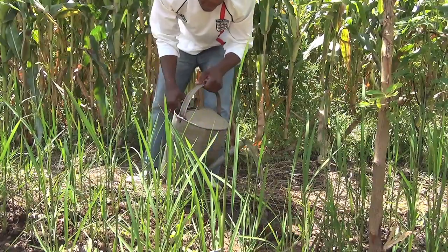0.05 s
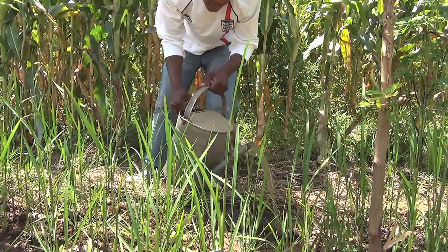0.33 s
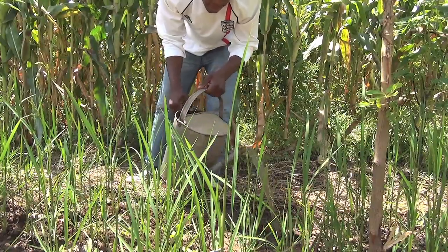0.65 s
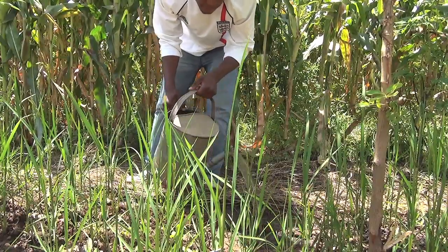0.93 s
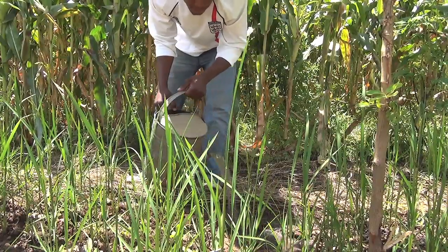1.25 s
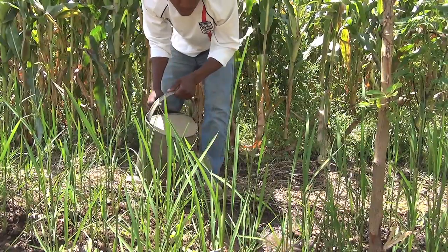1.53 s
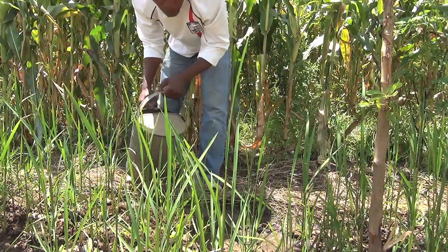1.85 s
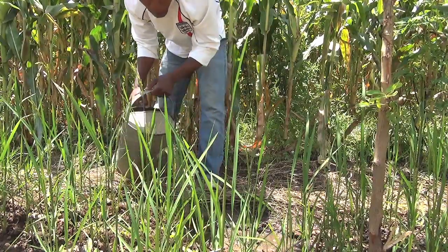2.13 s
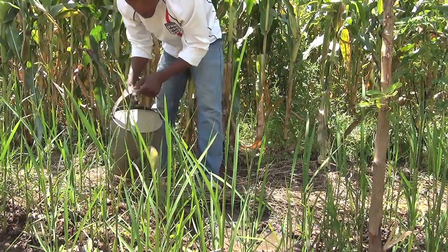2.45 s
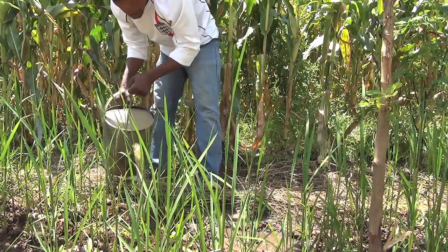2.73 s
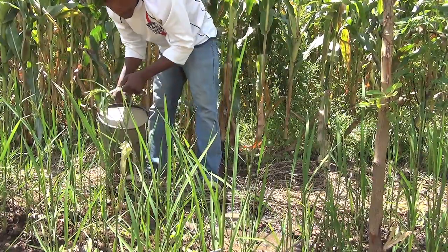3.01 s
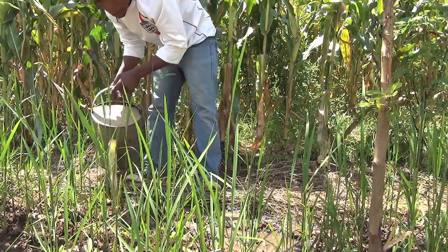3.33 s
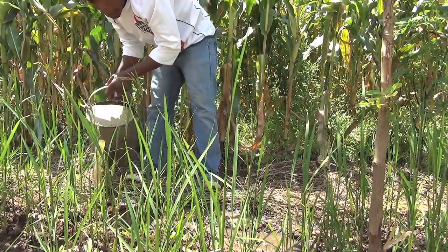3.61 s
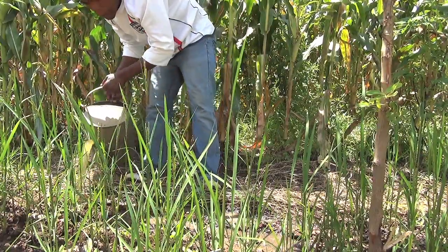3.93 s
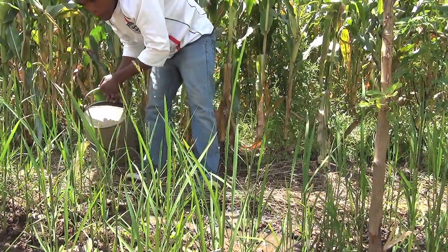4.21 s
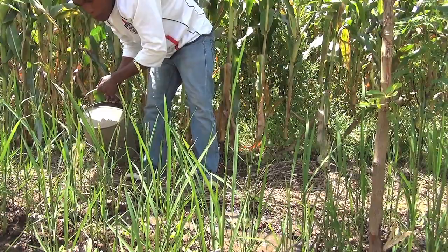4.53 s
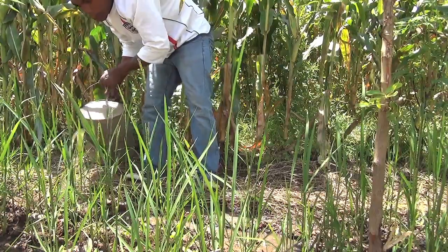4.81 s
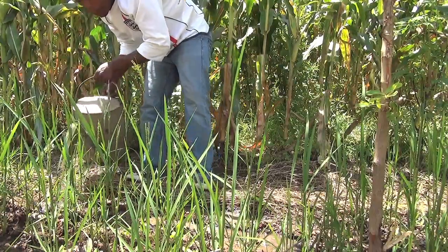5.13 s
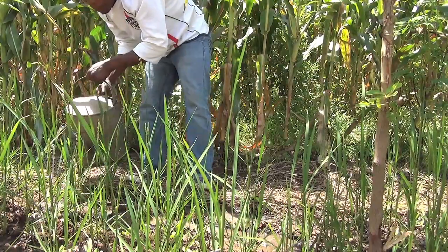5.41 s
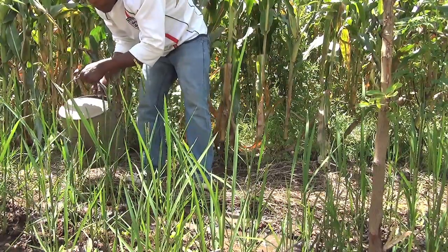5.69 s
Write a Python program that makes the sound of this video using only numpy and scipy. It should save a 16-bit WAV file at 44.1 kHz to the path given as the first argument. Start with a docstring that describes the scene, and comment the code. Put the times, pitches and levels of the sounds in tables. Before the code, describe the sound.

Liquid is poured from a bucket onto dry soil and leaf litter a few steps away in a quiet field. It makes a faint, uneven, crackling spatter, with drops ticking on dry leaves and tiny bubbles plipping in the wet patch. Near the end a few heavier slops land, a dry stalk snaps, and the stream thins to light ticking.

```python
"""Liquid is poured from a bucket onto dry soil and leaf litter in a field, a few steps away.
Drops pat on the earth, tiny bubbles burst in the wet patch and dry leaves crackle under the spatter.
The last slops land heavily, a dry stalk snaps, and only the litter goes on ticking."""
import sys
import numpy as np
from scipy import signal
from scipy.fft import rfft, irfft, next_fast_len
from scipy.io import wavfile
from scipy.ndimage import uniform_filter1d, map_coordinates

SR = 44100
rng = np.random.default_rng(int(sys.argv[2]) if len(sys.argv) > 2 else 0)


def wav_out(sig):
    """Save sig, one row per channel (or a flat mono array), as 16-bit PCM at SR to the path in sys.argv[1]."""
    wavfile.write(sys.argv[1], SR, np.round(np.clip(np.atleast_2d(sig).T, -1, 1) * 32767).astype(np.int16))


N = 262836

# the loudest ticks of drops on dry leaves: (s, dB over 5 ms, centre Hz, t60 s)
TICKS = [(0.188, -42.5, 6160, 0.04), (0.1978, -40.5, 4830, 0.011), (.229, -46, 5610, 0.0086), (0.3087, -42, 5900, .006), (.326, -47, 5900, .008), (0.3348, -44, 5540, 0.013), (0.3699, -40, 5500, .022),
         (0.384, -43, 4640, 0.015), (0.4, -41.5, 5700, 0.012), (0.4707, -49, 3920, 0.023),
         (0.496, -41, 5300, 0.008), (0.536, -44, 5600, 0.0073), (0.762, -42.5, 3540, 0.041), (0.7844, -40.5, 4340, 0.015), (.791, -45, 4470, .016), (.8303, -47, 5580, .006), (0.8516, -42.5, 5960, 0.021), (0.8755, -44, 5730, .005),
         (0.9387, -43, 4100, 0.023), (1.0223, -43, 3970, 0.0059), (1.113, -43.5, 4700, 0.0055), (1.1717, -44.5, 5350, .008), (1.2015, -43.5, 4560, 0.036),
         (1.2277, -46, 6300, 0.0053), (1.353, -43.5, 5630, 0.0089), (1.462, -46, 4400, 0.0097), (1.603, -40.5, 6430, 0.0079),
         (1.738, -42, 3680, 0.012), (1.7768, -34.5, 5100, 0.0095), (1.812, -48, 3200, 0.011), (1.8174, -45, 3800, 0.0066), (1.8355, -48, 6300, .005), (1.859, -45, 3300, .009), (1.91, -42.5, 3170, 0.012),
         (1.99, -45.5, 5240, 0.0099), (2.089, -47, 4200, 0.0064), (2.1119, -40, 5600, 0.015),
         (2.226, -44, 3040, 0.012), (2.3858, -44.5, 4030, 0.0046), (2.4233, -42.5, 4430, 0.012), (2.6693, -37, 3460, 0.0045), (2.675, -50, 4600, .003), (2.722, -50, 5290, .006),
         (2.782, -57, 4310, 0.014), (2.9624, -54, 4180, .003), (3.0504, -48, 2800, 0.0036), (3.088, -45, 4100, 0.0079), (3.2052, -44.5, 4780, 0.0025), (3.2993, -36, 3800, 0.003),
         (3.322, -41, 5200, 0.032), (3.331, -40.5, 4960, 0.017), (3.351, -51, 3600, 0.011), (3.3778, -40, 3930, 0.0068), (3.3856, -47, 3720, 0.0089), (3.432, -30, 5370, 0.022), (3.4603, -39, 5480, 0.012),
         (3.527, -44, 4200, 0.012), (3.5521, -42, 6150, .004), (3.687, -42.5, 4900, 0.014), (3.8103, -34.5, 3700, 0.0043), (3.8132, -43, 3460, .007), (3.837, -40, 5500, .006),
         (3.8684, -42.5, 4470, 0.014), (3.8745, -37, 4770, 0.011), (3.8787, -32.5, 4460, 0.0042), (3.8808, -39.5, 4200, 0.0045), (3.895, -38.5, 3620, 0.018), (3.958, -45, 5060, .012), (4.031, -47.5, 4230, 0.012), (4.064, -42, 4320, 0.013), (4.0676, -42.5, 3900, 0.0079), (4.08, -43, 4300, 0.007), (4.173, -41.5, 4760, 0.017), (4.2053, -42.5, 3380, 0.0067),
         (4.2368, -38.5, 5970, 0.0047), (4.248, -42, 5800, 0.0036), (4.386, -46, 4230, .03), (4.407, -43, 5100, 0.013), (4.6136, -44, 4190, 0.007), (4.702, -41.5, 4440, 0.015), (4.7137, -43, 3380, 0.0081),
         (4.7674, -37.5, 4440, 0.028), (4.8404, -37.5, 5060, 0.018), (4.85, -35, 5370, 0.039), (4.8615, -33, 4360, 0.034),
         (4.877, -37.5, 4500, 0.066), (5.126, -44, 3980, 0.025), (5.2344, -41.5, 4730, 0.0068), (5.2604, -40.5, 7440, 0.012),
         (5.327, -44, 5140, 0.0064), (5.339, -41, 6640, .017), (5.359, -42, 6760, 0.0069), (5.4002, -45, 5140, 0.0071),
         (5.4527, -40.5, 5470, .007), (5.4632, -40.5, 5400, 0.0091),
         (5.519, -46, 5200, 0.0043), (5.5285, -40, 5200, 0.0053), (5.539, -46, 6760, .007), (5.5415, -41, 5900, 0.0057), (5.5685, -50, 6490, .005), (5.606, -41.5, 6500, 0.015), (5.6262, -41, 5030, 0.005),
         (5.658, -49, 5100, .005), (5.6726, -47.5, 5850, 0.0036), (5.6814, -39.5, 6300, 0.0034), (5.706, -54, 7800, .005), (5.757, -51, 5800, .003), (5.764, -44, 6440, 0.0037), (5.799, -48, 6300, 0.012), (5.81, -44, 5820, 0.0042), (5.821, -52, 7100, 0.0073), (5.828, -45, 5760, 0.0059)]
# the loudest plips in the puddle: (s, dB over 5 ms, Hz)
PLIPS = [(.197, -52.5, 2250), (.4715, -54, 2800), (.495, -51.5, 2630), (.7125, -53, 2400), (0.8034, -50, 2700), (1.164, -49, 2440), (1.2412, -56, 1900), (1.4104, -55, 2220),
         (1.4335, -46, 1790), (1.453, -53, 1970), (1.4617, -56, 1770), (1.596, -52, 1770), (1.613, -56, 1540), (1.6259, -53, 2220), (1.6856, -55.5, 2050), (1.7798, -48, 2050),
         (1.817, -47, 2280), (1.9905, -54.5, 2070), (2.0505, -55, 1990), (2.1075, -49.5, 2400), (2.1688, -50, 2370), (2.2058, -47, 1900), (2.229, -52, 1850), (2.254, -60, 1220), (2.3506, -52, 2380),
         (2.3853, -51, 1570), (2.4602, -54.5, 2880), (2.517, -57.5, 1270), (2.6145, -55, 1850), (2.6403, -52.5, 2570), (2.7523, -53, 2120), (2.7826, -52.5, 2100), (2.9697, -55.5, 2200),
         (3.2818, -49, 2480), (3.3496, -53, 1840), (3.371, -43, 2640), (3.385, -46, 2720), (3.397, -49, 1920), (3.457, -48.5, 2190), (3.511, -52, 1660), (3.522, -49.5, 1410),
         (3.527, -51, 2070), (3.7792, -58, 1690), (3.9591, -46.5, 1660), (4.2045, -42, 2180), (4.5335, -46.5, 2800), (4.5488, -47, 1930), (4.5966, -48.5, 2780),
         (4.8974, -50, 1660), (4.9586, -45, 2390), (4.9665, -48, 2210), (5.0973, -46.5, 1870), (5.1089, -48.5, 2160), (5.1277, -49, 1930),
         (5.208, -50, 2690), (5.419, -56.5, 1410), (5.479, -54.5, 1910), (5.7945, -56, 3040)]
# slops on the earth: (s, dB over 5 ms, centre Hz, width octaves)
SLOPS = [(.122, -64, 433, 0.44), (0.151, -61, 650, 1), (.672, -60, 630, 0.48), (0.77, -59, 500, 1), (.887, -62, 750, 0.63), (0.9385, -57, 480, 1.4), (1.1819, -56.5, 680, 0.76), (1.4285, -63, 700, 1.1), (1.433, -56, 560, 2.2),
         (1.548, -61, 500, .8), (1.5926, -57, 320, 1.3), (1.705, -59.5, 650, 0.67), (2.2858, -56, 440, 0.91), (2.3307, -50.5, 620, 2), (2.4468, -53, 810, 0.93), (2.6683, -54, 730, 1.9),
         (2.745, -53.5, 970, 0.35), (2.84, -57.5, 895, 0.5), (3.075, -57.5, 830, 0.53), (3.1484, -54.5, 800, 0.49), (3.678, -58.5, 850, 0.4), (4.044, -54, 840, 0.63), (4.0686, -53.5, 766, 0.98),
         (4.458, -58.5, 764, 0.92), (4.561, -69, 740, 0.64), (4.704, -52, 400, 2.3), (4.751, -57, 340, 1.2), (4.7655, -53.5, 380, 0.83), (4.77, -51.5, 363, 1.6),
         (4.836, -51.5, 450, 2.5), (4.844, -51, 290, 1.9), (4.8605, -50, 680, 2.1), (4.904, -64, 540, 1.3), (4.99, -56, 400, 1.5), (5.083, -54, 450, 1.5), (5.136, -47.5, 470, 0.86)]
# fibres of a dry stalk giving way, one after another: (s, dB over 5 ms, centre Hz, width octaves, t60 s)
SNAP = [(4.9845, -46, 5000, 0.62, .012), (4.988, -33, 5000, 0.66, 0.0046), (4.9902, -28.5, 5750, 0.54, 0.0045),
        (4.9918, -31, 4600, 0.23, 0.0073), (4.9938, -30, 9100, 0.34, 0.0043), (4.9955, -30, 6460, 0.64, 0.0082)]
AIR = [(20, 2), (100, 2.5), (350, -4), (600, -5), (1500, -7.5), (3000, 0.5), (5000, -5), (10000, -3), (15500, -4.5)]  # still field: (Hz, dB per Hz)
MICROPHONE = [(100, -0.5), (1000, 3), (2800, 1), (4200, -0.5), (6000, -1), (7500, -2), (9500, -1.5), (11200, -2.5), (12500, -8), (14000, -10), (15700, -11.5)]  # (Hz, dB)
TOP_HZ = 15800  # fixed
# the low background: (s, rumble dB, far drone dB)
LOWS = [(0, -80, -91), (.6, -86, -89), (1.5, -82, -80), (2.5, -90, -85), (3.3, -80, -75), (4.05, -78, -95), (4.4, -77, -75),
        (4.85, -77, -74), (5.2, -95, -77), (5.96, -85, -84)]
# a soft low bump: (s, dB over 5 ms, Hz)
BUMP = (3.96, -53.5, 78)
RUMBLE = [(20, -3), (45, 4), (85, 1.5), (115, 9), (170, 1), (400, -29), (1000, -18.5)]  # (Hz, dB per Hz)
# the first liquid runs over the lip with a hollow, sinking note: (s, dB, Hz)
LIP = [(.35, -110, 830), (.45, -75, 820), (.57, -59, 760), (.66, -67, 725), (.8, -66, 685), (.9, -74, 660), (1, -110, 660)]
# how hard the stream hits the ground as the bucket is tipped and swung: (s, dB over an even pour)
STREAM = [(0, 1.5), (.1, -1.5), (.33, 0.5), (.8, 0.5), (.93, -2.5), (1.13, 0.3), (1.55, 0.4), (1.8, 1.3), (2, 0), (2.22, 1.1),
          (2.6, -1), (2.69, -2), (2.73, 2), (2.83, 1), (2.87, -2.5), (2.93, -2), (2.97, 2), (3.03, -3.5), (3.1, 0.8), (3.3, 2.6), (3.47, 4), (3.68, 1), (3.87, 0), (3.98, -1.5),
          (4.2, 2.5), (4.35, -1.2), (4.72, 1), (4.88, 1.5), (5.22, 8), (5.31, 3.5), (5.45, 2), (5.68, -2), (5.96, -0.5)]
# how much of it lands in the puddle rather than on dry litter: (s, dB)
PUDDLE = [(0, -3.5), (.36, -5.5), (.6, -3.5), (.95, 0), (1.35, -0.5), (1.52, -3), (1.6, 1.5), (1.72, 0.5), (2.1, -0.5), (2.4, 1), (2.6, -3), (2.9, 0), (3.2, -2.7), (3.37, 1), (3.46, -2), (3.65, 1), (4.02, 2.5), (4.35, 0),
          (4.85, 2), (5.22, -4), (5.34, -4), (5.42, -2.5), (5.5, -9), (5.62, -16), (5.96, -17)]
# level of each part of the spatter: (dB in an even pour, dB per dB of stream, dB per dB of puddle)
PAT_LAW = (-74, 0.041, 0.26)
GURGLE_LAW = (-69, 0.35, 0.98)
BUBBLE_LAW = (-61.5, 1, 1.73)
SPLASH_LAW = (-53.5, 1, 0.1)
LITTER_LAW = (-56.5, 1, -0.29)
DROP_HZ = 4600  # pitch of the splashing drops in an even pour
DROP_SINK = .018  # octaves that drops ring lower for each dB more in the puddle  # fixed
EMPTY_S, DRAIN_S, DRIP_SHARE = 5.25, 0.39, .3  # the stream starts to thin, for how long, share of drops left
TICK_OCTAVES, TICK_HZ, TICK_NARROWING = 0.48, 5280, 1.35  # width of a tick at this pitch; higher ticks are narrower
SMALL_TICKS = (8, -53.5, 2, 5600, 0.5, 0.007)  # (per s, dB in an even pour, scatter dB, Hz, scatter octaves, t60 s)  # fixed
# something thin, perhaps the bucket's handle, pings at nearly one pitch: (s, dB over 5 ms, Hz)
PINGS = [(3.7887, -38, 4370), (4.2834, -40, 4300), (4.4788, -38.5, 3900)]
PING_OCTAVES, PING_T60_S = 0.16, 0.018
SMALL_PLIPS = (4, -56.5, -0.5, 2194, 0.43)  # (per s, dB in an even pour, scatter dB, Hz, scatter octaves)
GULP_RATE, GULP_WET_DB, GULP_DRY_DB = 24, 3.3, 1.2  # chance swells a second, their depth in the puddle and on the litter
RIM_HZ, RIM_OCTAVES, RIM_DB = 4080, 0.01, -21  # a faint steady ring in the spatter
TICK_SPREAD = .04  # ticks are broader on wet leaves: doublings of width for each dB more in the puddle  # fixed
SPRAY_S, SPRAY_WET_DB, SPRAY_DRY_DB = 0.0096, 2, 2.5  # a large drop throws a cloud of small ones: half length, lift in the puddle, on the litter
CLICK_DB = -1.5  # clicks, relative to the litter
SLOP_T60_S, SLAP_DB = 0.027, -6  # how fast a slop dies; its bright slap  # fixed
THUD_HZ, THUD_DB, THUD_DB_PER_OCTAVE = 153, -9, 16  # the ground's thud under a slop at 400 Hz; deeper slops thud more
SPLASHY_T60_S = 0.0098  # ticks shorter than this are dry clicks, with less crumple, scatter and spray
# short reflections off the bucket wall, ground and leaves come and go as the stream is swung: (middle s, half length s, delay s, share; negative = flipped)
REFLECTIONS = [(.75, .75, .00167, -.25), (.65, .4, .0018, .16), (1.2, .8, .00261, .13), (2.25, .3, .00107, .17), (2.8, .25, .001, .22), (4.1, .5, .00263, -.22), (4.55, .3, .0025, .2), (4.7, .4, .00087, -.17)]  # fixed
GURGLE_HZ, GURGLE_SINK = 1324, 0.047  # pitch of the gurgle at the start; octaves per s that it sinks as the stream digs a hollow
PLIP_CYCLES, PLIP_SLAP_DB = 9.5, 2  # a plip's bubble is short-lived and weaker than its slap  # fixed
GRIT_DB = 4  # scatter in size of the tiny snaps that make up a leaf's rattle  # fixed


def amp(db):
    """Decibels to gain."""
    return 10 ** (np.asarray(db) / 20)


def unit(x):
    """Scale to rms 1."""
    return x / np.sqrt(np.mean(x ** 2) + 1e-20)


def along(points, hz):
    """Read (Hz, value) points on a log axis."""
    f, v = np.transpose(points)
    return np.interp(np.log(hz + 1), np.log(f + 1), v)


def curves(rows):
    """One value per sample for each column after the time."""
    s, *cols = np.transpose(rows)
    return [np.interp(np.arange(N) / SR, s, c) for c in cols]


def wobble(rate):
    """A smooth random curve, rate knots a second."""
    return map_coordinates(rng.standard_normal(int(N * rate / SR) + 4), [np.arange(N) * rate / SR])


def filtered(x, gain):
    """x times a gain that depends on frequency."""
    size = next_fast_len(N + SR // 4)
    return irfft(rfft(x, size) * gain(np.fft.rfftfreq(size, 1 / SR)), size)[:N]


def add(track, s, db, sound):
    """Mix in a short sound at s seconds, with the energy of db held for 5 ms."""
    span = .005 * SR  # fixed
    start = max(round(s * SR), 0)
    part = track[start:start + len(sound)]
    part += (amp(db) * np.sqrt(span) * sound / np.linalg.norm(sound))[:len(part)]


def burst(t60, size=4096, grit_db=0):
    """Dying noise of energy 1; grit breaks it into separate snaps."""
    hiss, snaps = rng.standard_normal((2, size))
    noise = hiss * amp(grit_db * np.minimum(snaps, 2) - 60 * np.arange(size) / SR / max(t60, 1e-3))  # fixed
    return noise / np.linalg.norm(noise)


def band(x, hz, octaves, count=1):
    """A broad causal resonance, reaching so many octaves to each side; count passes steepen its flanks."""
    edges = np.clip([hz / 2 ** octaves, hz * 2 ** octaves], [20, 40], [.4 * SR, .48 * SR])  # fixed
    return signal.sosfilt(np.tile(signal.butter(1, edges, "bandpass", fs=SR, output="sos"), (count, 1)), x)


def scatter(x, wet_db, t60):
    """The direct sound and its brief scatter off soil and stalks, different for every spot."""
    path = amp(wet_db) * burst(t60)
    path[0] += 1
    return signal.fftconvolve(x, path)[:len(x)]


def grains(rate, hz, spread, cycles, size_db, clump_db, rise, wet_db, size=256, count=5):
    """A shower of tiny damped rings from several spots on the ground, rms 1."""
    share = np.interp(np.arange(N) / SR, [EMPTY_S, EMPTY_S + DRAIN_S], [1, DRIP_SHARE])
    clumps, t, shower = amp(clump_db * np.tanh(wobble(45))), np.arange(size) / SR, np.zeros(N)
    for spot in range(count):
        when, pitch, weight, life, luck = np.random.default_rng(rng.integers(1 << 30)).random((int(rate * N / SR / count), 5)).T
        start = (when * (N - 1)).astype(int)
        ratio = 2 ** (spread * np.log((pitch + .02) / (1.02 - pitch)) / 2)  # fixed
        f = np.minimum(np.broadcast_to(hz, N)[start] * ratio, TOP_HZ)[:, None]
        age = t * f / (cycles * (.5 + life[:, None]))
        # a bubble's pitch climbs as it dies
        rings = np.sin(2 * np.pi * f * t * (1 + rise * np.minimum(age, 1))) * np.exp(-np.pi * age) * (1 - np.exp(-10 * age))
        # most grains are small, a few are large; they arrive in clumps and get fewer as the stream thins
        strength = amp(size_db * np.minimum(-np.log(1 - weight), np.pi)) * clumps[start] * np.sqrt(ratio) * (luck < share[start])
        ground = np.bincount((start[:, None] + np.arange(size)).ravel(), (rings * strength[:, None]).ravel(), N + size)[:N]
        shower += scatter(ground, wet_db, t60=0.043)
    # the flow is even over a tenth of a second or so
    power = uniform_filter1d(uniform_filter1d(shower ** 2, size=2800), size=2800)
    return shower / np.sqrt(np.abs(power) + 1e-4)  # fixed


def spatter():
    """The stream breaks into drops: dull pats, gurgle, bubbles, bright splashes and crackling litter."""
    _, puddle_db = stream_at(np.arange(N) / SR)
    brighter = 2 ** (-DROP_SINK * puddle_db)
    pats = grains(rate=450, hz=310, spread=0.81, cycles=1.9, size_db=3.0, clump_db=5.0, rise=0.049, wet_db=-15.0, size=768)
    deeper = 2 ** (-GURGLE_SINK * np.arange(N) / SR)
    gurgle = grains(rate=700, hz=GURGLE_HZ * deeper, spread=0.38, cycles=5.5, size_db=4.5, clump_db=5.5, rise=0.023, wet_db=-15.0, size=768)  # fixed
    bubbles = grains(rate=800, hz=2153, spread=0.42, cycles=7.1, size_db=4.5, clump_db=3.5, rise=0.016, wet_db=-7.0, size=640)
    drops = grains(rate=1300, hz=DROP_HZ * brighter, spread=0.43, cycles=7.2, size_db=4.5, clump_db=2.5, rise=0.059, wet_db=-1.5, count=12)
    litter = grains(rate=1500, hz=8850, spread=0.43, cycles=2.96, size_db=6.0, clump_db=0.5, rise=0, wet_db=4.0, size=96, count=10)
    # a few drops strike taut dry blades squarely and click without ringing
    clicks = grains(rate=150, hz=5900 * brighter, spread=0.39, cycles=2.4, size_db=7.0, clump_db=1.0, rise=0, wet_db=-7.5, size=96)
    blades = band(litter + amp(CLICK_DB) * clicks, hz=7500, octaves=2.38, count=2)  # small blades radiate little bass
    wet = gain(PAT_LAW) * pats + gain(GURGLE_LAW) * gurgle + gain(BUBBLE_LAW) * bubbles
    dry = gain(SPLASH_LAW) * drops + gain(LITTER_LAW) * blades
    # the stream arrives in uneven gulps, felt most in the puddle, and thickens around the large drops
    gulps = np.tanh(wobble(GULP_RATE))
    wet_db = GULP_WET_DB * gulps + SPRAY_WET_DB * clouds(list(PLIPS) + list(SLOPS))
    dry_db = GULP_DRY_DB * gulps + SPRAY_DRY_DB * clouds([row for row in TICKS if row[3] > SPLASHY_T60_S] + list(PINGS))
    sound = amp(wet_db) * wet + amp(dry_db) * dry
    # the bucket's rim rings faintly
    return sound + amp(RIM_DB + puddle_db / 2) * band(sound, RIM_HZ, RIM_OCTAVES)


def cracks(rows, edge_db, wet_db, lead_db, lead=0.0056):
    """Each crack is a slight crumple, one sharp push and a few ms of rattle through a leaf's broad resonance."""
    track = np.zeros(N)
    for s, db, hz, octaves, t60 in rows:
        splashy = min(t60 / SPLASHY_T60_S, 1)
        push = splashy * burst(t60, grit_db=GRIT_DB)
        push[0] += amp(min(edge_db, 0))
        crumple = splashy * amp(lead_db) * burst(0.027, size=round(lead * SR))[::-1]
        ring = band(np.concatenate([crumple, push]), hz, 1.9 * octaves, count=4)
        add(track, s - lead, db, scatter(ring, wet_db + 10 * np.log10(splashy), t60=0.058))
    return track


def plips(size=2048):
    """A drop slaps the puddle and traps a short-lived bubble of rising pitch."""
    track, t = np.zeros(N), np.arange(size) / SR
    small_s, small_db, small_hz = strays(*SMALL_PLIPS)
    for s, db, hz in list(PLIPS) + list(zip(small_s, small_db + stream_at(small_s)[1], small_hz)):
        age = t * hz / PLIP_CYCLES
        bubble = np.sin(2 * np.pi * hz * t * (1 + 0.068 * np.minimum(age, 1))) * np.exp(-2 * age) * (1 - np.exp(-10 * age))
        slap = band(burst(0.014, size, GRIT_DB), hz, 0.38, count=2)
        add(track, s, db, scatter(unit(bubble) + amp(PLIP_SLAP_DB) * unit(slap), wet_db=-4, t60=0.055))  # fixed
    return track


def slops():
    """Thick gulps of liquid slap the earth, which hardly rings but thuds under the deep ones."""
    track = np.zeros(N)
    for s, db, hz, octaves in SLOPS:
        add(track, s, db, band(burst(SLOP_T60_S), hz, octaves, count=2))
        add(track, s, db + SLAP_DB, band(burst(0.009), 1900, 1.5, count=2))
        add(track, s, db + THUD_DB - THUD_DB_PER_OCTAVE * np.log2(hz / 400), band(burst(.04), THUD_HZ, 0.87, count=2))
    return track


def field():
    """Faint open air, a rumble and a far drone that wavers in pitch and level."""
    rumble_db, drone_db = curves(LOWS)
    air = unit(filtered(rng.standard_normal(N), lambda hz: amp(along(AIR, hz))))
    rumble = unit(filtered(rng.standard_normal(N), lambda hz: amp(along(RUMBLE, hz))))
    phase = 2 * np.pi * np.cumsum(60 + 1.83 * wobble(1.5)) / SR
    drone = unit(np.sin(phase) + amp(-3.5) * np.sin(2 * phase)) * amp(1.9 * wobble(7.5))
    return amp(-63.5) * air + amp(rumble_db) * rumble + amp(drone_db) * drone


def lip():
    """A loose crowd of small bubbles rings at the bucket's lip as the pour begins."""
    db, hz = curves(LIP)
    return amp(db) * grains(rate=900, hz=hz, spread=.14, cycles=7, size_db=1, clump_db=1, rise=0, wet_db=0, size=1024)  # fixed


def bump():
    """One soft low bump."""
    track = np.zeros(N)
    s, db, hz = BUMP
    add(track, s, db, band(burst(0.054), hz, 0.9, count=2))
    return track


def stream_at(s):
    """Strength of the stream and its share in the puddle (both dB) at s seconds."""
    return np.interp(s, *np.transpose(STREAM)), np.interp(s, *np.transpose(PUDDLE))


def gain(law):
    """Gain over time of one part of the spatter, following the stream and the puddle."""
    db, per_stream, per_puddle = law
    stream_db, puddle_db = stream_at(np.arange(N) / SR)
    return amp(db + per_stream * stream_db + per_puddle * puddle_db)


def strays(rate, db, scatter_db, hz, octaves):
    """Stray larger drops, one at a random moment of each time slot: columns s, dB, Hz."""
    slots = np.arange(int(rate * N / SR))
    when, size, pitch = np.random.default_rng(rng.integers(1 << 30)).random((len(slots), 3)).T
    s = (slots + when) / rate
    even = lambda u: np.sqrt(3) * (2 * u - 1)  # fixed
    return s, db + scatter_db * even(size) + stream_at(s)[0], hz * 2 ** (octaves * even(pitch))


def ticks():
    """Large drops tick on dry leaves, with smaller strays between them, and the handle pings."""
    *shower, small_t60 = SMALL_TICKS
    small = [(s, db, hz * 2 ** (-DROP_SINK * stream_at(s)[1]), small_t60) for s, db, hz in zip(*strays(*shower))]
    leaves = [(s, db, hz, TICK_OCTAVES * (TICK_HZ / hz) ** TICK_NARROWING * 2 ** (TICK_SPREAD * stream_at(s)[1]), t60)
              for s, db, hz, t60 in list(TICKS) + small]
    handle = [(s, db, hz, PING_OCTAVES, PING_T60_S) for s, db, hz in PINGS]
    return cracks(handle + leaves, edge_db=-10.5, wet_db=-6, lead_db=-14)  # fixed


def clouds(rows):
    """Swells from 0 towards 1 as each large drop lands, then fades."""
    near = np.zeros(N)
    near[[round(row[0] * SR) for row in rows]] = 1
    t = np.arange(-SR // 10, SR // 10 + 1) / SR
    return np.tanh(signal.fftconvolve(near, np.exp(-np.abs(t) / np.where(t < 0, SPRAY_S / 2, 2 * SPRAY_S)), "same"))


def hollow(x):
    """Near surfaces answer within 3 ms and give the pour a hollow tint that shifts with the stream."""
    t, sound = np.arange(N) / SR, x.copy()
    for middle, half, delay, share in REFLECTIONS:
        sound += share * np.exp(-((t - middle) / half) ** 4) * np.pad(x, (round(delay * SR), 0))[:N]  # fixed
    return sound


def scene():
    """Spatter, single drops and the snapping stalk over the quiet field."""
    snap = cracks(SNAP, edge_db=-7, wet_db=-13, lead_db=-18)  # fixed
    pour = hollow(spatter() + amp(2.5) * plips() + ticks()) + amp(-5.5) * lip() + slops()
    return (pour + snap + bump() + field())[None]


def record(dry):
    """The microphone dulls the top treble, adds faint hiss and keeps nothing above its band limit."""
    sound = filtered(dry[0], lambda hz: amp(along(MICROPHONE, hz))) + amp(-70.0) * rng.standard_normal(N)
    return filtered(sound, lambda hz: hz < TOP_HZ)[None]


dry = scene()
out = record(dry)
wav_out(out)
```